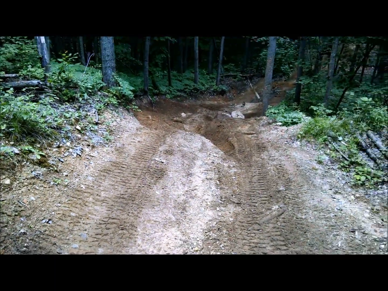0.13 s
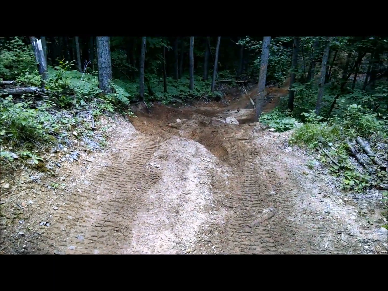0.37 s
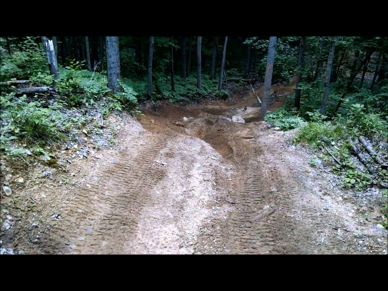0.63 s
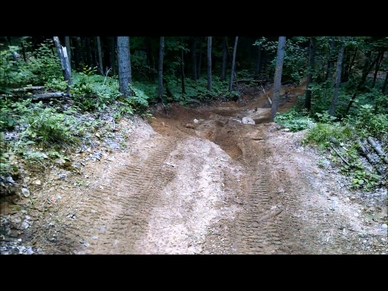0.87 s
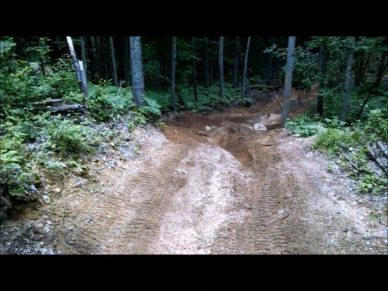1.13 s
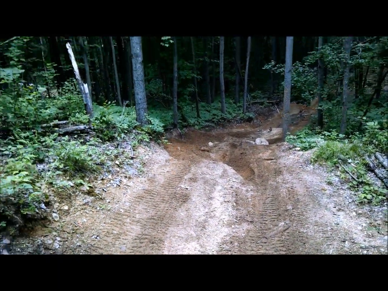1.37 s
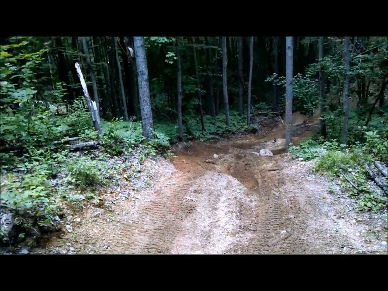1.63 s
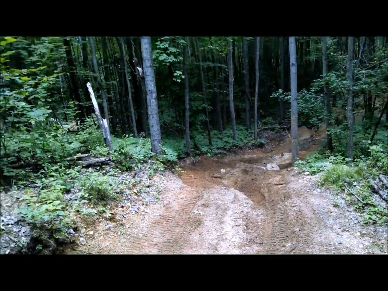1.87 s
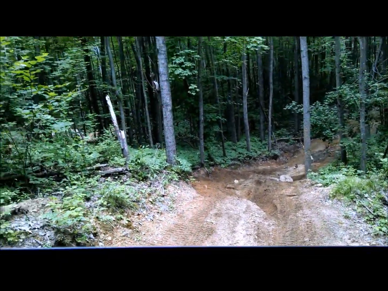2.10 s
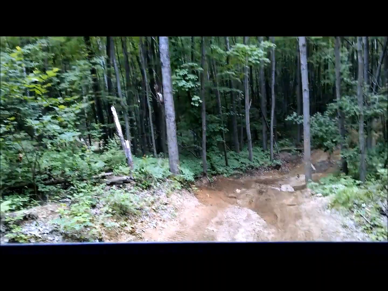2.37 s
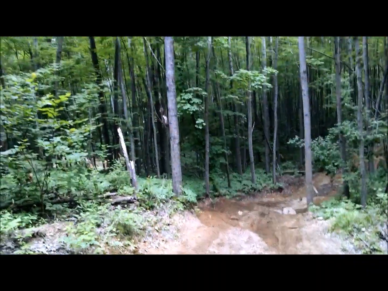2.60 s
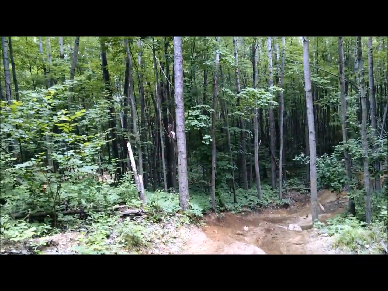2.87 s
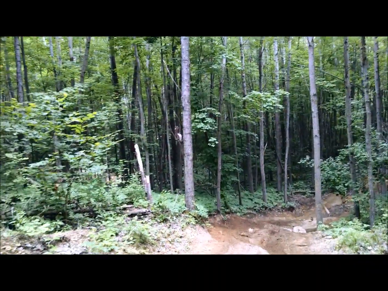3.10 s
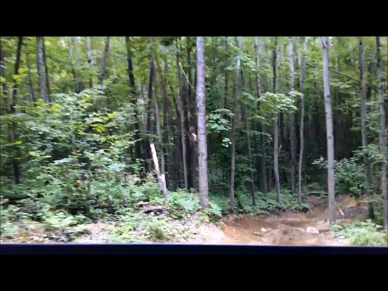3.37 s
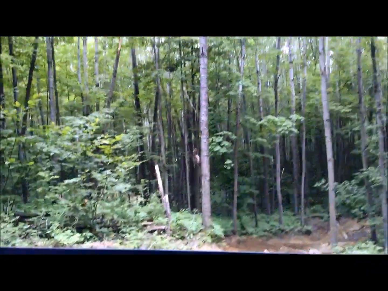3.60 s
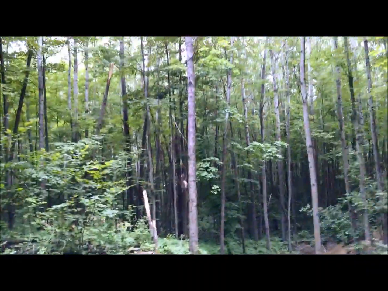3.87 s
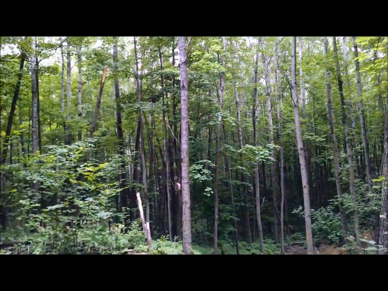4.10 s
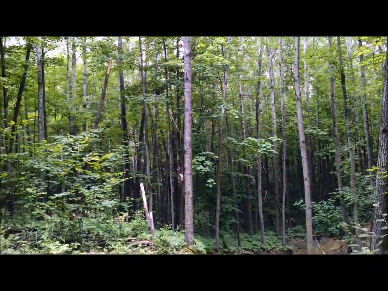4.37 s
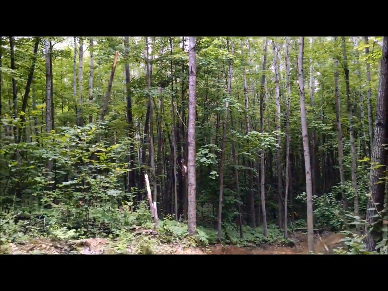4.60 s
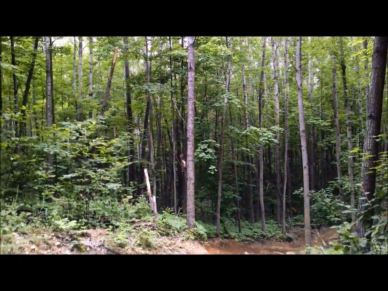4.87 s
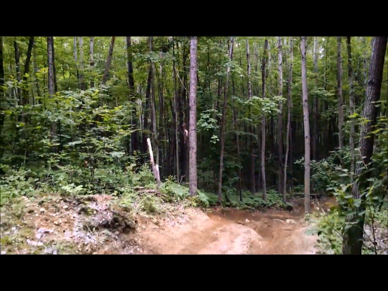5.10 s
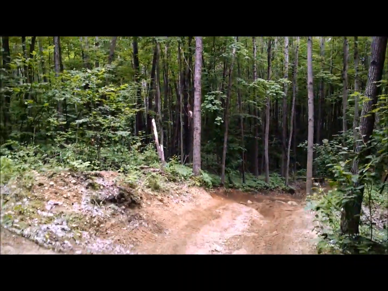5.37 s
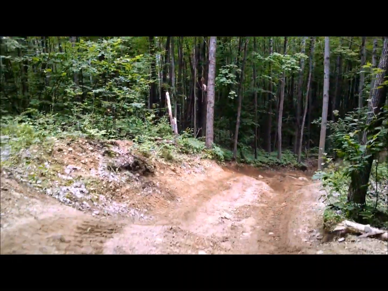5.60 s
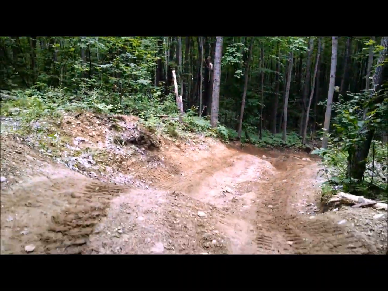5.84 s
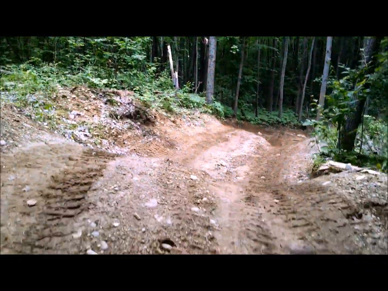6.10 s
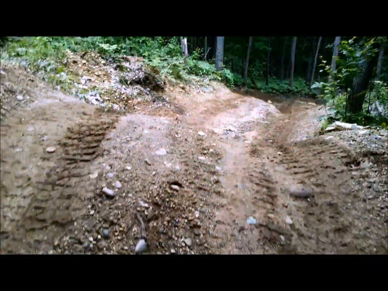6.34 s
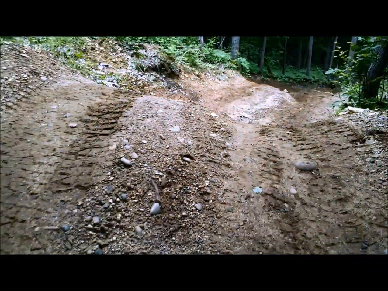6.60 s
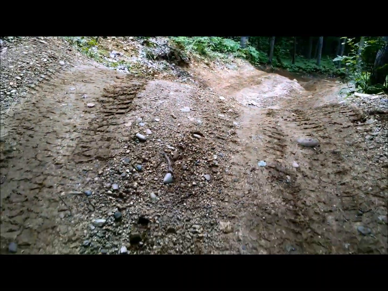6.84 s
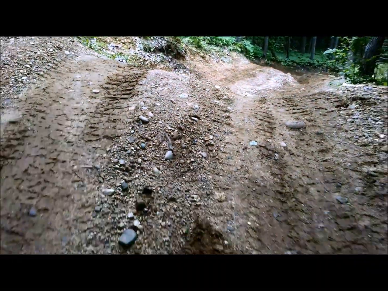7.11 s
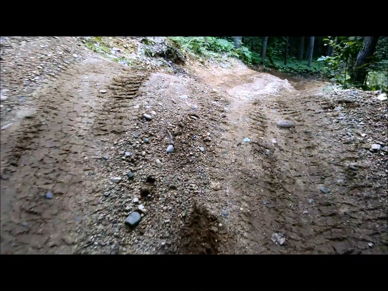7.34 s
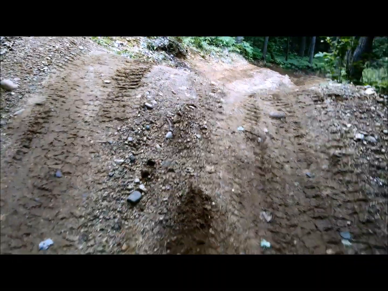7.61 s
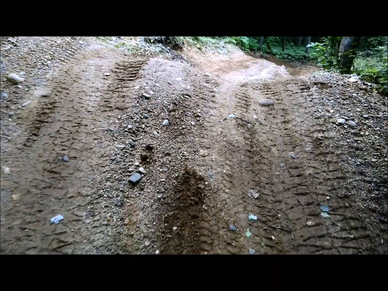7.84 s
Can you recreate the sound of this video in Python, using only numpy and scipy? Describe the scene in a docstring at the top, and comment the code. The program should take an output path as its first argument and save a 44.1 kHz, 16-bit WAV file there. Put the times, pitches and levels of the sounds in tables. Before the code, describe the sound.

Inside an off-road car, a low four-cylinder engine dips, climbs, drops sharply at a gear change and climbs again, amid chassis knocks and scraping dirt.

```python
"""Woods, on board a four-cylinder off-road car that crawls over a dirt hump, in stereo.
Engine orders sweep through cabin resonances as the revs climb, drop at a gear change, then rise and ease.
Shaped noise gives tyre rumble, fan and intake hiss, valve clatter, the belly's scrape and gravel on panels.
Damped modes give the chassis knocks; gliding sines give a gear whine and a small bird's song.
Pressure steps give ticks of the camera mount; decaying noise gives the echo of the woods."""
import sys
import numpy as np
from scipy import signal
from scipy.fft import rfft, irfft, next_fast_len
from scipy.io import wavfile
from scipy.ndimage import uniform_filter1d, map_coordinates

SR = 44100
rng = np.random.default_rng(int(sys.argv[2]) if len(sys.argv) > 2 else 0)


def convert_level_to_amplitude(level_db):
    """Map a level in decibels to its linear amplitude factor."""
    exponent = np.asarray(level_db, float) / 20
    return 10 ** exponent


def log_audio(samples):
    """Write samples as a 16-bit WAV file to the path given in sys.argv[1]."""
    # one column per channel
    frames = np.atleast_2d(samples).T
    # limit to full scale, then quantise
    limited = np.clip(frames, -1, 1)
    pcm = np.round(limited * 32767).astype(np.int16)
    wavfile.write(sys.argv[1], SR, pcm)


N = 351477
T = np.arange(N) / SR  # time [s]


def unit(x):
    """Normalisation: x scaled to an rms of 1."""
    return x / np.sqrt(np.mean(x ** 2) + 1e-20)


def along(points, hz):
    """Logarithmic frequency scale: rows (frequency, value, ..) interpolated along it."""
    f, *cols = np.transpose(points)
    return np.squeeze([np.interp(np.log(hz + 1), np.log(f + 1), v) for v in cols])


def curves(rows):
    """Slow modulation: a gate that closes outside the table's times, and each column as a curve."""
    s, *cols = np.transpose(rows)
    gate = np.clip(np.minimum(T - s[0], s[-1] - T) / 0.034 + 1, 0, 1)
    return gate, [np.interp(T, s, c) for c in cols]


def wobble(rate, order=3):
    """Band-limited fluctuation: a random curve through `rate` knots a second."""
    knots = rng.standard_normal(int(N * rate / SR) + 4)
    return map_coordinates(knots, [T * rate], order=order)


def filtered(x, response):
    """Linear filtering: the spectrum of x times a complex response of frequency."""
    m = next_fast_len(N + 8192)
    return irfft(rfft(x, m) * response(np.fft.rfftfreq(m, 1 / SR)), m)[..., :N]


# Coherence of the two channels of a noise: (frequency [Hz], left-right correlation before the lag [1])
LIKENESS = [(60, 0.97), (130, 0.75), (290, 0.19), (640, 0.46), (1400, 0.96), (3080, -0.53), (6760, 0.48),
            (14800, 0.042)]


def rush(spectrum, patchy_db):
    """Partly coherent turbulence: stereo noise of about unit rms, with random gain in time and frequency."""
    z = signal.stft(rng.standard_normal((2, N)), nperseg=512)[2]
    field = rng.standard_normal(z.shape[1:])
    field = uniform_filter1d(uniform_filter1d(field, 4, 0), 10, 1)
    pair = signal.istft(z * convert_level_to_amplitude(patchy_db * unit(field)), nperseg=512)[1][:, :N]

    def mixing(hz):
        angle = np.arccos(np.clip(along(LIKENESS, hz), -1, 1)) / 2
        lag = .7 * (hz > 1700)  # treble: part of the difference is the sum shifted a quarter cycle
        shares = [np.cos(angle), 1j * np.sin(angle) * np.sin(lag), np.sin(angle) * np.cos(lag)]
        return convert_level_to_amplitude(along(spectrum, hz)) * shares

    mid, shifted, other = filtered(pair[[0, 0, 1]], mixing)
    return np.array([mid + shifted + other, mid - shifted - other]) / np.std(mid)


# Side signal against mid signal: (frequency [Hz], level [dB], phase [rad])
PORT_DIFFERENCE = [(40, -5, 1.5), (90, -13, .5), (168, -7.5, 1.2), (240, 1.5, 2.2), (276, 5, 1.9),
                   (276, 6, 1.6), (275, -2, 1.8), (396, -4, 2.57), (1000, -6, 5.4), (2000, 2, 1.6)]


def ports(mid):
    """Structure-borne transmission: the mount feeds two ports at unlike strength and phase."""
    def response(hz):
        level_db, phase = along(PORT_DIFFERENCE, hz)
        return convert_level_to_amplitude(level_db) * np.exp(1j * phase)

    side = filtered(mid, response)
    return np.array([mid + side, mid - side])


# Reverberation of the woods: (frequency [Hz], decay time to -60 dB [s])
WOODS_DECAY = [(200, 0.59), (2000, 0.34), (9000, 0.33)]


def woods(x):
    """Reverberation: trunks and banks answer, each frequency decaying at its own rate."""
    hz, t, z = signal.stft(rng.standard_normal((2, SR // 2)), SR, nperseg=256)
    decay = convert_level_to_amplitude(-60 * t / along(WOODS_DECAY, hz)[:, None])
    tail = signal.istft(z * decay, SR, nperseg=256)[1]
    return signal.fftconvolve(x, tail / np.linalg.norm(tail[0]), axes=1)[:, :N]


# Bird whistles: (time [s], length [s], held frequency [Hz], level [dB])
BIRD_WHISTLES = [(5.46, .115, 7350, -54), (5.755, .14, 7430, -55), (6.03, .14, 7350, -55)]
# Short bird notes of arched pitch: (time [s], level [dB])
BIRD_ARCHES = [(5.585, -57), (5.858, -53), (6.135, -56), (6.18, -60)]


def bird():
    """Frequency modulation: pure tones slide down to a held pitch or arch up and back."""
    slide_hz, arch_s, foot_hz, top_hz = 750, .055, 5950, 6780
    notes = [(s, length, db, [0, .22, 1], [hz + slide_hz, hz, hz]) for s, length, hz, db in BIRD_WHISTLES]
    arch_hz = [foot_hz, top_hz - 150, top_hz, foot_hz]
    notes += [(s, arch_s, db, [0, .25, .5, 1], arch_hz) for s, db in BIRD_ARCHES]
    song = np.zeros(N)
    for s, length, db, shares, pitch in notes:
        u = np.clip((T - s) / length, 0, 1)
        swell = np.abs(np.sin(np.pi * u ** .8)) ** .6 * (u < 1)
        phase = 2 * np.pi * np.cumsum(np.interp(u, shares, pitch)) / SR
        song += swell * convert_level_to_amplitude(db + 1.5 * wobble(90)) * np.sin(phase)
    return song * convert_level_to_amplitude([[1.5], [-1.5]])  # louder on the left


# Spectrum of the tyre rumble: (frequency [Hz], relative level per hertz [dB])
RUMBLE_SPECTRUM = [(15, -32), (30, -27), (60, 3), (120, -12), (200, -4.5), (320, -36), (600, -90)]
# Mean course of the rumble: (time [s], level [dB])
RUMBLE_COURSE = [(0, -37), (.45, -48), (1.62, -57), (2.22, -44), (3.24, -46.5), (3.7, -36), (4.24, -45),
                 (5.3, -41.5), (7.04, -44.5), (7.97, -49)]


def rumble():
    """Random excitation: tyres on dirt make low noise of slowly uneven level."""
    level_db = curves(RUMBLE_COURSE)[1][0] + 3.6 * wobble(5.1)
    lumps = filtered(rng.standard_normal(N), lambda hz: convert_level_to_amplitude(along(RUMBLE_SPECTRUM, hz)))
    return convert_level_to_amplitude(level_db) * unit(ports(lumps))


# Spectrum of the hiss: (frequency [Hz], relative level per hertz [dB])
HISS_SPECTRUM = [(900, -40), (1650, -15), (2700, -2.5), (3200, -4), (4100, 0.5), (4600, -0.5), (5200, -4.5),
                 (5700, -8.3), (7400, -9), (10000, -13), (13000, -12.8), (15400, -12.5)]
# Mean course of the hiss: (time [s], level [dB])
HISS_COURSE = [(0, -51), (.66, -50.3), (1.2, -53.5), (1.62, -54.5), (2.22, -51), (3.24, -50.8),
               (3.7, -48.5), (4.24, -52.5), (5.13, -49.8), (5.59, -49.8), (6.41, -51.7), (7.04, -51),
               (7.97, -54.3)]


def hiss(puff, shake):
    """Flow noise: fan and intake turbulence, lightly modulated by the firings."""
    level_db = curves(HISS_COURSE)[1][0] + 0.36 * puff + 0.55 * shake
    return convert_level_to_amplitude(level_db) * rush(HISS_SPECTRUM, patchy_db=0.9)


# Spectrum of the valve clatter: (frequency [Hz], relative level per hertz [dB])
CLATTER_SPECTRUM = [(110, -29), (200, -16.5), (260, -11), (400, -14), (520, -15), (750, -18.5), (1060, -26),
                    (1400, -23), (1650, -26.5), (2500, -27), (3100, -37.5), (4200, -70)]
# Mean course of the clatter: (time [s], level [dB])
CLATTER_COURSE = [(0.0, -40), (0.4, -42.5), (0.66, -41), (1.2, -43), (1.62, -45.5), (2.22, -40),
                  (3.24, -41), (3.7, -36.5), (4.24, -43), (5.13, -40), (5.59, -40.5), (6.41, -43),
                  (7.04, -42), (7.97, -46.5)]


def clatter(puff, shake):
    """Amplitude modulation: the noise of the valves pulses with the firings."""
    level_db = curves(CLATTER_COURSE)[1][0] + 0.83 * puff + 0.74 * shake + 0.83 * wobble(60)
    return convert_level_to_amplitude(level_db) * rush(CLATTER_SPECTRUM, patchy_db=0.5)


# Spells of gear whine: (time [s], length [s], start frequency [Hz], end frequency [Hz], level [dB])
WHINE_SPELLS = [(5.07, .105, 1380, 1520, -45), (5.62, .27, 1950, 1975, -50), (5.9, .17, 1978, 1980, -50),
                (6.92, .4, 1335, 1400, -53), (7.78, .22, 1300, 1275, -55)]


def whine():
    """Tooth meshing: a gliding tone of unsteady pitch and level."""
    out = np.zeros(N)
    for s, length, start_hz, end_hz, db in WHINE_SPELLS:
        u = np.clip((T - s) / length, 0, 1)
        flicker_db = 2.5 * wobble(45)
        hz = start_hz + (end_hz - start_hz) * u + 15 * wobble(70)
        fade = np.clip(np.minimum(3 * u, 8 - 8 * u), 0, 1)
        out += fade * convert_level_to_amplitude(db + flicker_db) * np.sin(2 * np.pi * np.cumsum(hz) / SR)
    return out


# Slips of the camera mount: (time [s], step level before its sag [dB], left minus right [dB])
MOUNT_SLIPS = [(1.0113, -19.5, -5), (1.1765, -19, -3), (1.1994, -18, 0.0), (1.3334, -18, -0.5),
               (6.0357, -19, 6), (6.1065, -18, -2.0), (6.2566, -20, 0), (6.9924, -25, -0.5),
               (7.4254, -18, -2), (7.5334, -17.5, -1.0), (7.7795, -20, -1)]


def ticks():
    """Step excitation: a slip of the camera mount jumps the pressure, which sags back without ringing."""
    out, t = np.zeros((2, N + SR)), np.arange(SR // 50) / SR
    step = (1 - np.exp(-t / .00011)) * np.exp(-t / .0016)
    for s, db, pan_db in MOUNT_SLIPS:
        gain = rng.choice([-1, 1]) * convert_level_to_amplitude(db + np.array([[.5], [-.5]]) * pan_db)
        out[:, round(s * SR):][:, :len(t)] += gain * step
    return out[:, :N]


# Sprays: (time [s], fine grit level [dB], coarse grit above fine [dB], panel above fine [dB],
#          time to -60 dB [s])
GRAVEL_SPRAYS = [(2.107, -37, -1, 8, 0.085), (2.168, -41.5, -14, 6, 0.044), (2.2672, -32, -17, -8, 0.025),
                 (2.4064, -54, 6, 12, 0.04), (3.475, -39, 2.5, 12, 0.033), (3.6277, -47, -1, 12, 0.05),
                 (3.9903, -49, .6, 7, 0.035), (4.0285, -35.5, -2, 2, 0.022), (4.1194, -56, 6, 9, 0.028)]
# Spectra of fine grit, coarse grit and panel: (frequency [Hz], relative level per hertz [dB])
FINE_GRIT = [(5500, -38), (7000, 0), (8600, -2), (12600, -7), (15400, -9.5)]
COARSE_GRIT = [(2500, -25), (3500, -5), (4400, 1), (6000, -5.5), (7500, -33)]
PANEL_SPECTRUM = [(350, -42), (600, -12), (812, -4), (1490, 2.5), (3000, -14.5), (3280, -34), (3500, -30),
                  (4550, -50), (7700, -120)]


def gravel():
    """Impact noise: thrown stones burst on the panels with a sharp start and a short tail."""
    hold = 1.46  # exponent; over 1 the spray holds before it dies
    fine, coarse, panel = np.zeros((3, N))
    for s, db, coarse_db, panel_db, t60 in GRAVEL_SPRAYS:
        decay_db = 60 * (np.abs(T - s) / np.clip(t60, .005, .3)) ** hold
        burst = (T >= s) * convert_level_to_amplitude(db - decay_db)
        fine += burst
        coarse += burst * convert_level_to_amplitude(coarse_db)
        panel += burst * convert_level_to_amplitude(panel_db)
    spray = fine * rush(FINE_GRIT, patchy_db=2.5)
    spray += coarse * rush(COARSE_GRIT, patchy_db=2.5)
    spray += panel * rush(PANEL_SPECTRUM, patchy_db=2.5)
    return convert_level_to_amplitude(2.7 * wobble(500)) * spray


# Blows: (time [s], clank mode level [dB], thud modes above it [dB], bright modes above it [dB],
#         left minus right [dB])
CHASSIS_BLOWS = [(0.661, -33, -1, -5.5, -8), (1.267, -36.5, -10, 5.5, -3), (1.274, -34.5, -7, 3.5, -5),
                 (2.16, -19.5, -20, -5.5, 1), (2.228, -40.5, -5, 14, -1.5), (2.375, -40.5, 4.5, -3.5, 6),
                 (2.407, -32.5, 0, -12.5, 9), (2.424, -28.5, -2, -9.5, 10),
                 (2.602, -30.5, 0.5, -11.5, -2.0), (3.478, -26.5, -25, 10, -2.0),
                 (3.626, -30.5, -1, -2, 0.0), (3.695, -28.5, 4, 2.5, -1.0), (3.879, -21, 8.5, -10.5, -2.5),
                 (4.067, -33, 0.5, -1.5, -5), (5.933, -37, -5, -6.5, -6)]
# Mean modes of the chassis: (frequency [Hz], relative level [dB])
CHASSIS_MODES = [(250, -3), (310, 5), (404, 4), (490, 4), (560, 0), (646, -9), (740, -2), (880, -1.5),
                 (1000, 2.5), (1150, 1.5), (1290, -7.5), (1450, -5), (1650, -6.5), (2000, -3.5),
                 (2315, -5.5)]


def knocks():
    """Modal ringing: each blow excites the chassis modes anew, low ones as thud, high ones as clank."""
    thud_t60, longer_per_db = .055, .001  # low modes [s] at a thud of -30 dB, and [s per dB] above it
    out, t = np.zeros((2, N + SR)), np.arange(SR // 4) / SR
    hz, level = np.transpose(CHASSIS_MODES)[:, :, None]
    for s, db, thud_db, bright_db, pan_db in CHASSIS_BLOWS:
        balance_db = np.where(hz < 700, thud_db, np.where(hz > 1300, bright_db, 0))
        strength = level + rng.normal(0, 2.1, hz.shape) + balance_db
        life = np.clip(thud_t60 + longer_per_db * (db + thud_db + 30), .02, .3)
        life = life * np.minimum(600 / hz, 1) ** 1.3  # high modes die sooner
        pitch = hz * (1 + rng.normal(0, 0.027, hz.shape))
        phase = 2 * np.pi * pitch * t + rng.normal(0, 0.64, hz.shape)
        ring = (convert_level_to_amplitude(strength - 60 * t / life) * np.sin(phase)).sum(0)
        # dull blows build more slowly
        rise = 1 - np.exp(-t * hz[2] / 0.65 * convert_level_to_amplitude(-np.clip(thud_db, -20, 0)))
        gain = convert_level_to_amplitude(db + np.array([[.5], [-.5]]) * pan_db)
        out[:, round(s * SR):][:, :len(t)] += gain * ring * rise
    return out[:, :N]


# Belly on rock: (start time [s], rise [s], lift-off time [s], grind level [dB], brightness [dB])
BELLY_DRAGS = [(3.17, .24, 3.495, -26.5, 0), (3.635, .04, 3.875, -24, 5), (3.97, 0.072, 4.11, -34, -5)]
# Spectra of floor pan grind and skid plate rasp: (frequency [Hz], relative level per hertz [dB])
GRIND_SPECTRUM = [(35, -30), (60, 0), (90, 0.5), (160, -3), (210, -12), (280, 1.5), (400, -1.5),
                  (500, -2.5), (700, -4.5), (1000, -14.5), (1400, -25), (2600, -80)]
RASP_SPECTRUM = [(700, -22), (1100, -1), (1600, -4), (2400, -0.5), (2900, -8), (3400, -12), (4500, -48)]


def scrape():
    """Sliding friction: dense slips on rock shake the floor pan, rasp a skid plate and fizz as grit."""
    swell_db, brightens_db = 14.5, 7  # rise of a drag; further rise of the rasp up to lift-off
    rasp_db, grit_db, grit_follows = -11.5, -31, 2.2  # against the grind; grit dB per dB of brightness
    grind_t60, rasp_t60 = 0.41, 0.11  # s after lift-off; the grit dies with the rasp
    grind_gain, rasp_gain, grit_gain = np.zeros((3, N))
    for s, rise, lift, db, bright_db in BELLY_DRAGS:
        press = (T >= s) * convert_level_to_amplitude(db - swell_db * np.clip(1 - (T - s) / rise, 0, 1))
        still_dull_db = brightens_db * np.clip((lift - T) / (lift - s), 0, 1)
        after = np.maximum(T - lift, 0)
        rasp_decay_db = 60 * after / rasp_t60
        grind_gain += press * convert_level_to_amplitude(-60 * after / grind_t60)
        rasp_gain += press * convert_level_to_amplitude(rasp_db + bright_db - still_dull_db - rasp_decay_db)
        grit_gain += press * convert_level_to_amplitude(grit_db + grit_follows * bright_db - rasp_decay_db)
    slips = convert_level_to_amplitude(1.3 * wobble(70) + 2 * wobble(250))
    grind = unit(slips * rush(GRIND_SPECTRUM, patchy_db=2.5))
    rasp = unit(slips * rush(RASP_SPECTRUM, patchy_db=3))
    grit = unit(slips * rush(FINE_GRIT, patchy_db=1.5))
    return convert_level_to_amplitude(1.2 * wobble(30)) * (grind_gain * grind + rasp_gain * rasp + grit_gain * grit)


# Strong orders: (multiples of the engine cycle rate [1])
MAIN_ORDERS = (2, 4, 6, 8, 10, 12, 16)
# Booms and notches of the cabin: (frequency [Hz], level [dB])
CABIN_RESPONSE = [(32, -13), (45, -1.8), (56, 3), (65, -2), (84, -2.5), (92, 0), (98, -6), (105, -20.5),
                  (112, -28), (122, -17), (135, -13.5), (146, -13.5), (156, -11), (165, -16), (175, -28),
                  (186, -36), (200, -37), (225, -37.5), (245, -34.5), (265, -30), (285, -46), (320, -46),
                  (350, -51), (400, -54), (450, -51.5)]


def strong_orders(rate, turn, load_db, upper_db, strong_db):
    """Forced vibration: firing and crank harmonics sweep through the cabin resonances."""
    crank_follows = -.5  # dB per dB of load: the lowest order shakes most off load
    tone = np.zeros(N)
    for k, db in zip(MAIN_ORDERS, strong_db):
        lead = .6 * np.exp(-((k * rate - 156) / 18) ** 2)  # an order crossing this boom runs ahead
        follows = crank_follows if k == MAIN_ORDERS[0] else 1
        level_db = db + load_db * follows + upper_db * (k in MAIN_ORDERS[-3:])
        level_db = level_db + along(CABIN_RESPONSE, k * rate) + 0.9 * wobble(22)
        tone -= np.sqrt(2) * convert_level_to_amplitude(level_db) * np.cos(k * turn + lead)
    return tone


# Imbalance of the cylinders: (order [1], mean relative level [dB])
IMBALANCE = [(1, -4), (3, 0.5), (7, 1.5), (9, -8), (13, -2.5), (17, 2), (19, -6), (20, 4.5), (22, -4),
             (24, 3.5), (26, -1.5), (35, -18.5)]


def weak_orders(turn, orders, drift):
    """Cylinder imbalance: unequal firings fill in the orders between, of drifting phase and level."""
    total = np.zeros(N)
    for k in orders:
        if k in MAIN_ORDERS:
            continue
        phase = k * turn + 2 * np.pi * rng.random() + drift * wobble(14, order=1)
        total += np.cos(phase) * convert_level_to_amplitude(along(IMBALANCE, k) + 2.7 * wobble(6, order=1))
    return total


# Engine speed, one list per gear: (time [s], cycle rate [cycles per s])
ENGINE_SPEED = [
    [(0.0, 24.6), (0.34, 21.45), (0.51, 20.13), (0.68, 19.4), (0.85, 19.41), (1.02, 20.46), (1.19, 21.76),
     (1.36, 22.86), (1.53, 23.25), (2.21, 24.49), (2.55, 24.98), (2.89, 26.64), (3.06, 26.93), (3.4, 27.37),
     (3.74, 29.17), (3.88, 31.08)],
    [(3.92, 15.74), (4.09, 16.3), (4.43, 17.12), (4.6, 18.26), (4.94, 20.28), (5.11, 20.94), (5.45, 21.59),
     (5.79, 22.47), (5.96, 22.63), (6.2, 22.65), (6.47, 22.96), (6.64, 22.56), (6.9, 21.05), (7.15, 20.19),
     (7.32, 19.73), (7.66, 18.38), (7.83, 17.92), (7.97, 17.77)],
]
# Engine load, one list per gear: (time [s], level [dB], extra level of the strong orders above 9 [dB])
ENGINE_LOAD = [
    [(0, -4, -3), (.13, -1, -3), (.34, -5.5, -6), (.6, -11, -5), (.85, -7, -4), (1.2, -1.5, -1),
     (1.8, -0.4, 0), (2.4, 3, -2), (3, 4.5, -7), (3.5, 1.5, -7), (3.88, -4, 0)],
    [(3.92, -21, 0), (4.08, -7, 0), (4.5, -3.5, 1), (5, -2, 0), (5.5, .5, 1.5), (5.85, 1, 0), (6.1, 1, -8),
     (6.55, .9, -9), (6.8, 0, -1), (7, -0.5, 0), (7.4, -1.7, -3), (7.97, -2.3, 0)],
]
# Strong orders' rms before load and cabin, one row per gear: (a level for each strong order [dB])
MAIN_LEVELS = [(-39.5, -20, -17, -13.5, -14.5, -7, -1), (-37, -19.5, -27.5, -9.5, -13.5, -5, 4.7)]
# In-between orders, one list per gear: (time [s], low orders' level [dB], high orders above low [dB])
BETWEEN_LEVELS = [
    [(0, -44.5, -10), (.55, -47.5, -10), (1.2, -38.5, -7), (2.2, -41, -6.5), (2.9, -43.5, 0),
     (3.88, -41, -2)],
    [(3.92, -46, -0.5), (4.9, -44, 3), (5.6, -45, 5.5), (6.45, -45.5, 0), (6.95, -45, 4), (7.3, -45, 2.5),
     (7.97, -45.5, -1)],
]
# Cabin colour of the in-between orders: (frequency [Hz], level [dB])
CABIN_COLOUR = [(20, 3), (70, -1), (150, 1), (220, -4.5), (330, -3), (430, -5.5), (520, -15), (800, -12),
                (1200, -50)]


def engine():
    """Order synthesis: harmonics of the engine cycle, and the puff of its four firings per cycle."""
    tone, puff = np.zeros(N), np.zeros(N)
    for speed, load, strong_db, between in zip(ENGINE_SPEED, ENGINE_LOAD, MAIN_LEVELS, BETWEEN_LEVELS):
        gate, (rate,) = curves(speed)
        load_db, upper_db = curves(load)[1]
        low_db, high_db = curves(between)[1]
        turn = 2 * np.pi * np.cumsum(rate) / SR + .009 * wobble(30)  # the crank runs slightly unevenly
        tone += gate * strong_orders(rate, turn, load_db, upper_db, strong_db)
        low = weak_orders(turn, range(1, 12), drift=1.1)  # ragged
        high = weak_orders(turn, range(13, 36), drift=.3)
        weak = gate * convert_level_to_amplitude(low_db) * (low + convert_level_to_amplitude(high_db) * high)
        tone += filtered(weak, lambda hz: convert_level_to_amplitude(along(CABIN_COLOUR, hz)))
        puff += gate * np.cos(4 * turn - 1.1)
    return ports(tone), puff


def scene():
    """Superposition: all sources and the echoes add at the two ports."""
    tone, puff = engine()
    shake = wobble(14)  # common to clatter and hiss
    bay = rumble() + hiss(puff, shake) + clatter(puff, shake)
    hits, song = knocks() + gravel(), bird()
    echoes = woods(convert_level_to_amplitude(-9) * hits + convert_level_to_amplitude(-3) * song)
    return song + echoes + bay + whine() + ticks() + hits + scrape() + tone


# Treble response of the finished sound, with narrow dips near 11 and 14 kHz and an upper limit
# at 15.5 kHz: (frequency [Hz], level [dB])
TREBLE_RESPONSE = [(10300, 0.5), (11200, -7), (12000, -1.5), (13250, -3.5), (13700, -23), (14400, -25),
                   (14650, -0.5), (15400, -5), (15520, -67)]


def treble_dips(x):
    """Linear filtering: narrow treble bands are weakened and the top of the spectrum is cut off."""
    return filtered(x, lambda hz: convert_level_to_amplitude(along(TREBLE_RESPONSE, hz)))


def top_cut(x):
    """Nothing passes above the cut-off."""
    return signal.sosfilt(signal.butter(12, 15450, fs=SR, output="sos"), x)


def record(dry):
    """Signal chain: the sound at the ports is filtered in the treble to become the finished mix."""
    mix = treble_dips(dry)
    return top_cut(mix)


dry = scene()
out = record(dry)
log_audio(out)
```